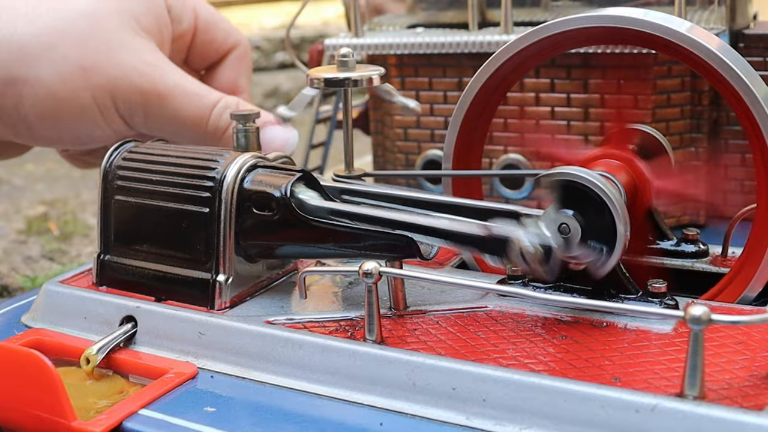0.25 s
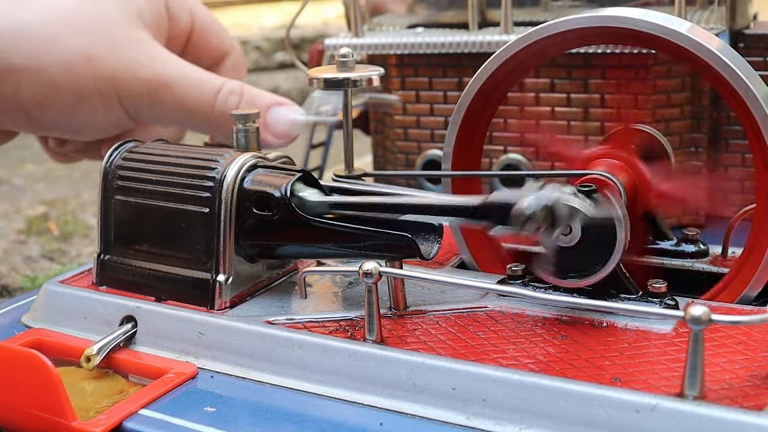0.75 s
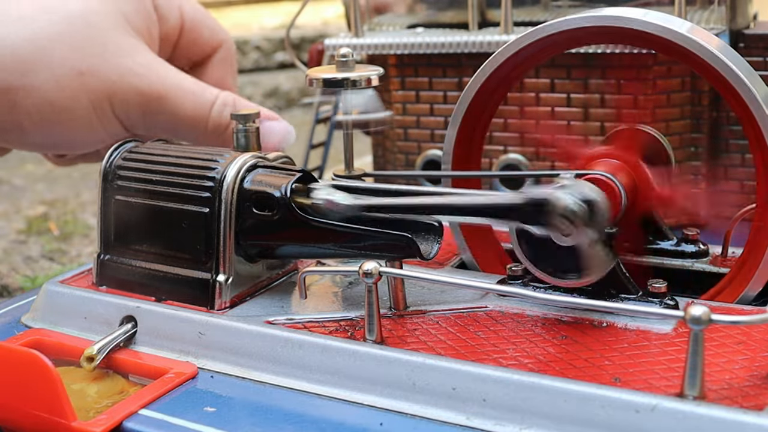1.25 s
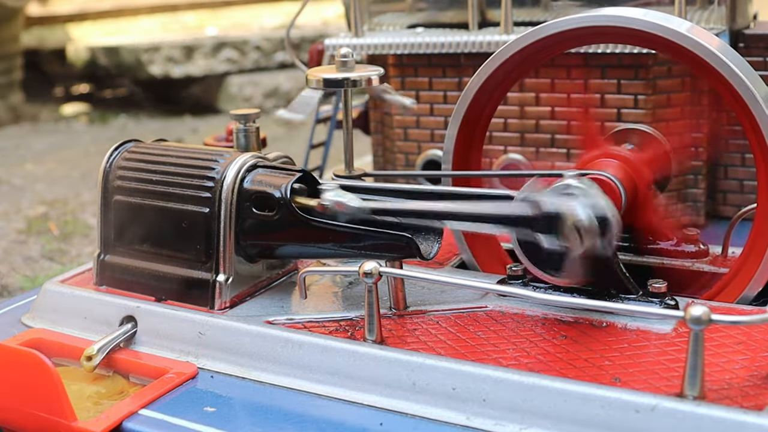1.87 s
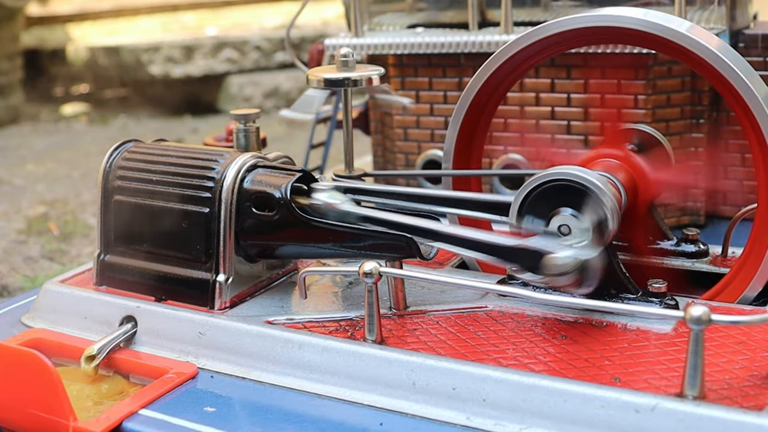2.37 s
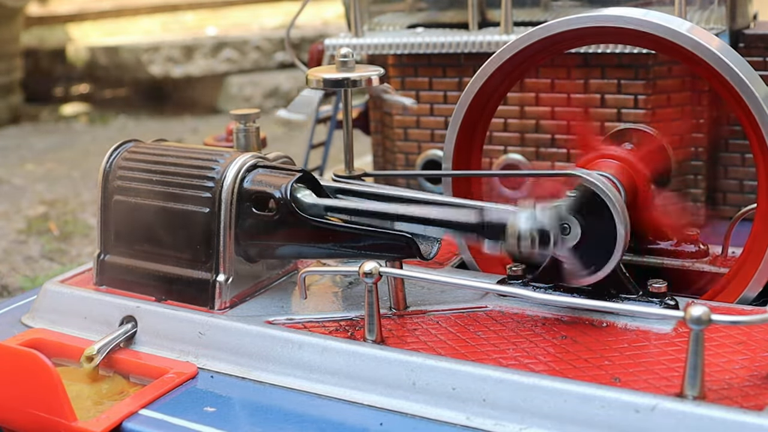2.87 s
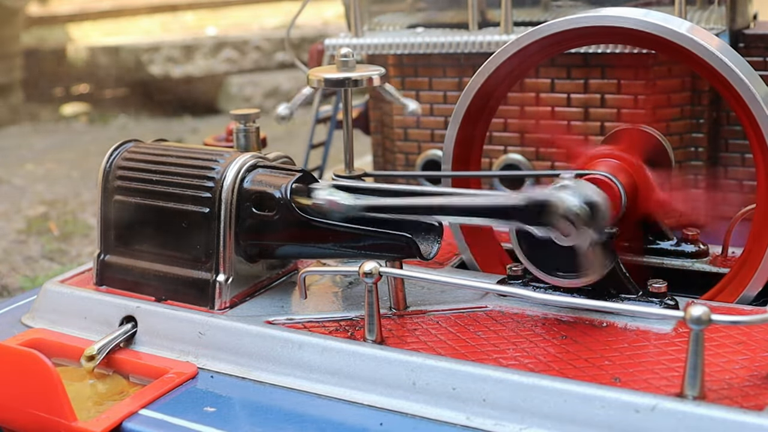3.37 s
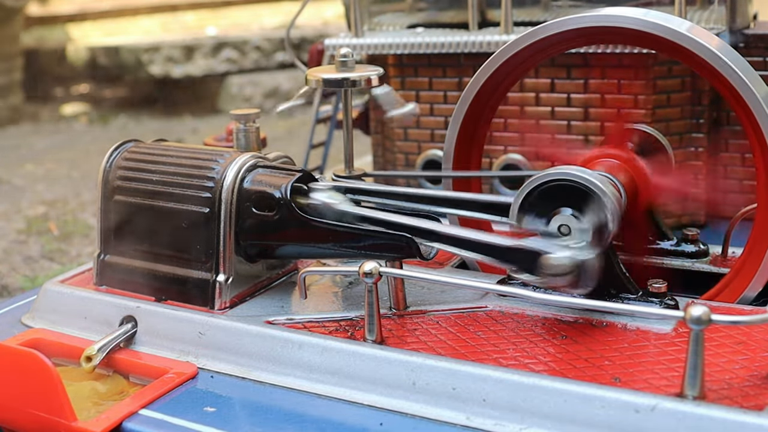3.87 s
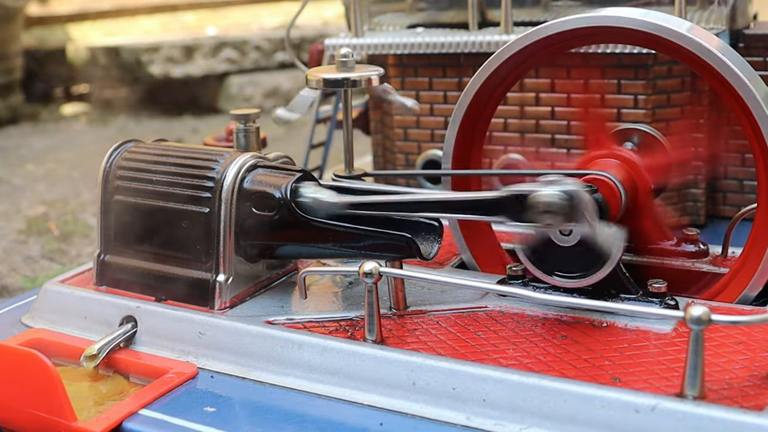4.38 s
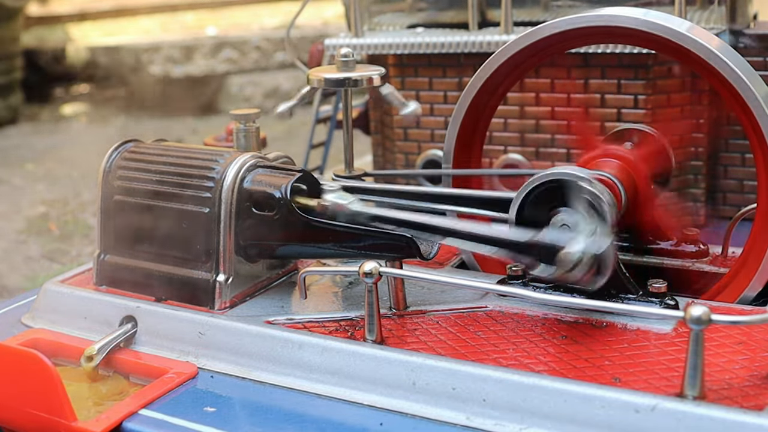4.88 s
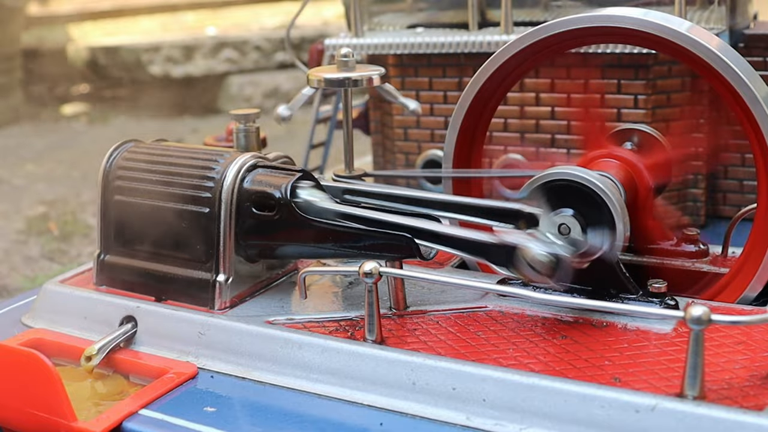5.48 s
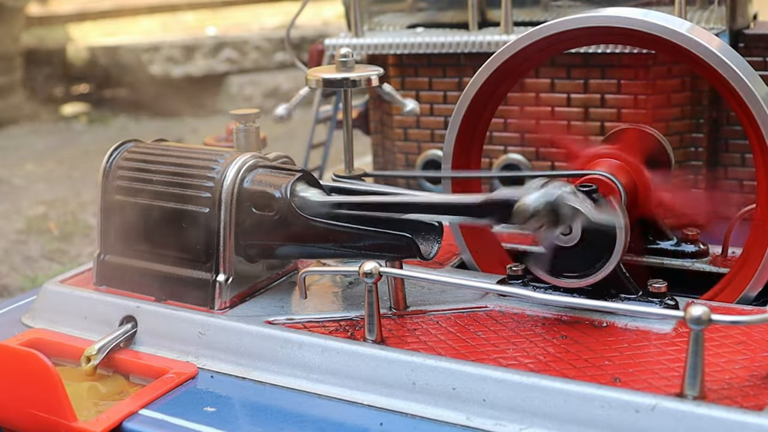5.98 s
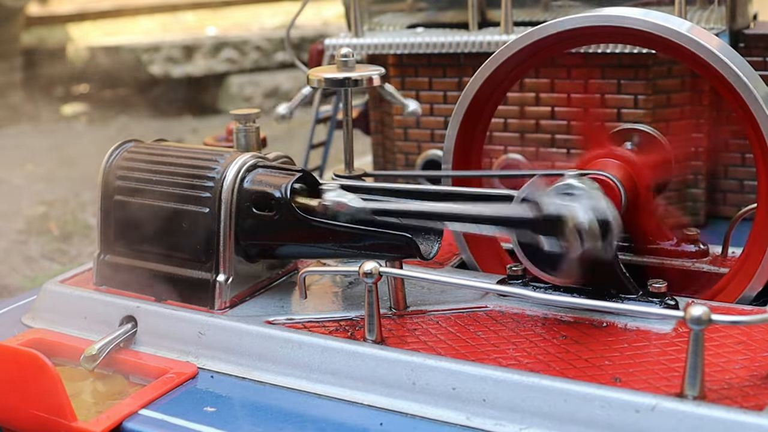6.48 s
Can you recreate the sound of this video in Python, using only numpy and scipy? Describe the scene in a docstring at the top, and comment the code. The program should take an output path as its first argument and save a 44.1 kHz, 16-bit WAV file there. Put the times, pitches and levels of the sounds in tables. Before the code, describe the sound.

From 0 to about 6.7 seconds a small model steam engine runs without pause, heard very close outdoors with hardly any echo. It turns about 8.5 times a second, dipping slightly near 0.7, rising to about 8.7 by 4 seconds, then easing a little. Each turn gives two brief exhaust puffs, crackling bursts of droplets and hiss, bright and uneven; wet slugs spit loudest in the first half second, around 1.3, 2.4 and 3.3 to 3.7, while the puffs thin out at moments between. Under them a repeating pattern of hollow knocks, dense metal rattle, a short valve rasp and a tiny high ping. Soft swishing follows the crank over a faint steady hiss. Lone drops snap throughout. A faint low rumble passes around 1.1 to 1.4, a dull stumbling bump at 2.5, and thin, very faint wavering whistles from 5.7 to 6.5. It ends still running.

```python
"""Model steam engine running outdoors

A model steam engine turns about 8.6 times a second, close to the microphone. Each end of the cylinder
puffs once a turn: bursts of drop spikes and hiss, as loud as the steam is wet, or a spat slug of condensate.
Slack in the rod and valve gear knocks a repeating pattern of hollow notes, rattle and ringing modes.
The valve rasps, a steel part pings, and noise swishes with the crank over a steady hiss. Single drops
snap, something bumps with a low rumble, and thin gliding sines whistle near the end."""
import sys
import numpy as np
from scipy import signal
from scipy.fft import rfft, irfft
from scipy.io import wavfile
from scipy.ndimage import uniform_filter1d, map_coordinates

SR = 44100
rng = np.random.default_rng(int(sys.argv[2]) if len(sys.argv) > 2 else 0)


def store_pcm(level_fs):
    """Save levels as 16-bit WAV."""
    pcm = np.round(np.clip(level_fs, -1, 1) * 32767).astype(np.int16)
    wavfile.write(sys.argv[1], SR, np.atleast_2d(pcm).T)


N = 297234
TIME = np.arange(N) / SR
MS = SR / 1000  # samples in a millisecond


def exhaust(drops_follow=.35):
    """Each cylinder end puffs once a turn, with fewer drops the drier the steam; lone drops snap between."""
    # wetness of the steam at each end, as the relative level of an ordinary puff: time_s, level_db
    first_wetness = [(0, -17.5), (1.0, -16), (1.802, -57), (2.299, -17), (2.8, -25.5), (3.55, -13.5),
                     (3.861, -26.5), (4.398, -11.5), (5.6, -16), (6.38, -22), (6.62, -15)]
    second_wetness = [(0.499, -8), (1.099, -18), (1.902, -15), (3.101, -12.5), (3.999, -26.5),
                      (4.502, -13.5), (5.452, -29), (5.9, -13), (6.7, -20.5)]
    # colours of the two puffs: frequency_hz, relative level_db
    first_spectrum = [(100, -37), (250, -17.5), (430, -10), (620, -22.5), (780, -16.5), (1600, -5),
                      (2200, -3), (2750, 1.5), (3300, -9), (4300, -3), (7500, -9), (11000, -14),
                      (13300, -20.5), (15200, -22.5)]
    second_spectrum = [(100, -28), (250, -11.5), (400, 3.5), (620, -4.5), (800, -9.5), (1600, 2),
                       (2200, 5.5), (2750, 7.5), (3500, -3.5), (5500, -3), (8500, -10.5), (10600, -9.5),
                       (13300, -23), (15200, -18)]
    # loudest lone drops snapping in the exhaust: time_s, relative level_db
    snaps = [(0.6645, -12.5), (1.030, -22.5), (1.1755, -8), (1.8186, -16.5), (2.083, -17.5), (2.4357, -40),
             (3.8553, -19.5), (3.8929, -19), (4.0795, -16), (4.280, -20), (4.3062, -30), (5.1604, -21),
             (5.219, -23.5), (5.3091, -20.5), (5.3374, -15.5), (5.8867, -19), (5.9164, -15.5), (6.142, -22),
             (6.192, -16.5), (6.5844, -15.5), (6.7166, -15.5)]
    # resonances of the exhaust outlet: pitch_hz, width_hz, level_db
    outlet = [(738, 61, 9.5), (1056, 46, 5), (2220, 27, -6.5), (3620, 61, 0.5), (4340, 67, 0),
              (9280, 390, 5), (10700, 320, 1), (14620, 1430, 8)]

    first, second = np.zeros(N), np.zeros(N)
    # ports open at these shares of a turn after the main knock
    for s, db, spread_s in puffs_of(.25, first_wetness, spread_s=.0044):
        wet = from_db(drops_follow * db)
        puff = spit(spread_s, pops_per_s=950 * wet, uneven_db=4, hiss_db=-4)
        add(first, s - 3 * spread_s, forced(puff, db))
    for s, db, spread_s in puffs_of(.665, second_wetness, spread_s=.0046):
        wet = from_db(drops_follow * db)
        puff = spit(spread_s, pops_per_s=700 * wet, uneven_db=6.5, hiss_db=-20.5)
        add(second, s - 3 * spread_s, forced(puff, db))

    for s, db in snaps:
        add(first, s, forced(signal.unit_impulse(64), db))
    for s, db in stray_drops():
        dull_drop = cut(signal.unit_impulse(64), 1993, "low", order=1)
        add(first, s, from_db(db) * unit_burst(dull_drop))

    first = at_microphones(first, first_spectrum, left_lead_ms=.084, pan_db=-2, scatter_db=-1.5, above_hz=630)
    second = at_microphones(second, second_spectrum, left_lead_ms=.081, pan_db=.5,
                            scatter_db=-1.5, above_hz=1460)
    puffs = from_db(-2) * first + from_db(-6.5) * second
    resonant = np.zeros_like(puffs)
    for hz, width_hz, db in outlet:
        b, a = signal.iirpeak(hz, hz / width_hz, fs=SR)
        resonant += from_db(db) * signal.lfilter(b, a, puffs)
    return puffs + resonant


def puffs_of(port, wetness, spread_s):
    """One puff a turn, as loud as the steam is wet, unless a slug leaves instead: rows of (s, dB, spread s)."""
    # slugs of condensate that spit out loudly in place of an ordinary puff: time_s, relative level_db, spread_s
    slugs = [(.039, -1.5, 0.0064), (.159, -3, .003), (.341, -4, 0.0092), (0.398, -4, 0.0085),
             (.458, -3, 0.0059), (.699, -7.5, 0.0051), (.812, -6.5, 0.0052), (.931, -9, 0.0044),
             (1.176, -10, 0.0015), (1.289, -2.5, 0.0056), (1.410, -4.5, 0.0033), (1.527, -6, 0.0041),
             (1.699, -7.5, 0.0057), (1.993, -7.5, 0.0073), (2.113, -5, 0.0052), (2.231, -7, 0.0047),
             (2.4, -1.5, 0.0066), (2.694, -7, 0.0074), (2.863, -7, 0.0035), (2.933, -12, 0.0029),
             (2.980, -4, 0.0042), (3.045, -7.5, 0.0026), (3.163, -10, 0.0018), (3.328, -1.5, 0.0049),
             (3.387, -8.5, 0.0049), (3.558, -0.5, 0.0065), (3.616, -9.5, .0032), (3.674, 0, 0.0032),
             (3.733, -8.5, 0.0031), (3.966, -6, 0.0038), (4.079, -3.5, 0.0027), (4.129, -5.5, 0.0056),
             (4.532, -5.5, 0.0043), (4.762, -10.5, 0.0031), (4.996, -5.5, .0029), (5.681, -6.5, 0.0079),
             (5.805, -5.5, 0.0028), (6.030, -4, 0.0073), (6.149, -7.5, .0033), (6.501, -10, .0022),
             (6.669, -8.5, 0.0056)]
    jitter_s, stretch_octaves, uneven_db = .0025, .35, 2  # chance in moment, length and level

    opens, rows = crank_passes(port), []
    quarter_turn_s = np.diff(opens).mean() / 4
    for s, (late, strength, stretch) in zip(opens, rng.standard_normal((len(opens), 3))):
        puff = (s + jitter_s * late,
                curve(wetness, s) + uneven_db * strength,
                spread_s * 2 ** (stretch_octaves * stretch))
        near = [slug for slug in slugs if abs(slug[0] - s) < quarter_turn_s]
        rows.append(near[0] if near else puff)
    return rows


def stray_drops(chance_per_turn=.35, level_db=-26):
    """Faint drops at any crank angle: rows of (s, relative dB)."""
    luck, share = rng.random((len(crank_passes(0)), 2)).T
    return [(s, level_db) for s in crank_passes(share)[luck < chance_per_turn]]


def spit(spread_s, pops_per_s, uneven_db, hiss_db):
    """Drops burst out one by one, each a one-sided pressure spike, in a swell of hiss six spreads long."""
    size = int(6 * spread_s * SR)
    swell = np.exp(-(np.linspace(-3, 3, size)) ** 2 / 4) * signal.windows.tukey(size)
    gaps = rng.gamma(2, .5, 200)  # irregular, mean 1
    sizes = np.minimum(rng.standard_normal(200), 1)
    at = (np.cumsum(gaps) * SR / pops_per_s).astype(int)
    inside = at < size
    pops = np.zeros(size)
    pops[at[inside]] = from_db(uneven_db * sizes[inside])
    hiss = rng.standard_normal(SR // 10)[np.arange(size) % (SR // 10)]
    return unit_burst(unit_burst(pops * swell) + from_db(hiss_db) * unit_burst(hiss * swell))


def forced(burst, db, bright_hz=13000, dulling=1.0, uneven_db=3):
    """A burst at level db; the harder it comes out, the higher the edge of its one-pole low-pass."""
    edge_hz = bright_hz * from_db(dulling * db + uneven_db * rng.standard_normal())
    pole = np.exp(-2 * np.pi * edge_hz / SR)
    return from_db(db) * unit_burst(signal.lfilter([1], [1, -pole], burst))


def linkage(ring_db=1.0, uneven_db=2.5, rattle_s=0.0044, rise_s=0.0011, loose_db=-7, size=2048):
    """Slack contacts repeat much alike each turn: a hollow note, a dense rattle and the ring of the bed."""
    # knocks in each turn: delay_s after the main knock, relative level_db, pitch_hz, swell_s, pitch_fall (1/s)
    contacts = [(-.0148, -26, 1340, 0.0018, 2), (0.0, -16.5, 995, 0.0013, 4.5),
                (.0055, -24.5, 680, 0.00091, -71), (.009, -26.5, 1230, .001, -31),
                (.0138, -35, 980, .0013, 8), (0.0118, -31.5, 423, 0.0013, -19),
                (0.033, -25.5, 1430, 0.00053, -5), (0.0403, -21, 1072, 0.00097, 53),
                (0.0469, -35, 510, 0.00062, 11), (0.0482, -30, 956, 0.0011, -4),
                (.052, -29.5, 461, 0.0019, 6), (.055, -35.5, 800, 0.0023, 24)]
    # ring of the bed plate and rods: pitch_hz, relative level_db, t60_s
    bed_modes = [(206, -10.5, 0.11), (500, -7, 0.22), (843, 2, 0.093), (1023, -4.5, 0.091),
                 (1412, 6, 0.027), (1674, 2, 0.048), (2136, -0.5, 0.035), (2705, 8.5, 0.028),
                 (3135, 3, 0.033), (3330, -1.5, 0.047), (3710, 2, 0.017), (4200, 3, 0.029),
                 (5540, -3, 0.028)]
    # dense rattle of the bed plate: frequency_hz, relative level_db
    bed_spectrum = [(80, -27.5), (200, -14), (500, -1.5), (1000, -20.5), (1700, -2.5), (2700, -3.5),
                    (4000, -4), (4800, -10.5), (6500, -12), (9000, -17.5), (13300, -47), (15200, -45)]
    rattle_db, note_uneven_db, note_detune = -1.5, 1.2, .015

    out, loose = np.zeros(N), np.zeros(N)
    knocks, t = crank_passes(0), TIME[:size]
    ring = from_db(ring_db) * unit_burst(ringing(bed_modes, t))
    rise = 1 - np.exp(-t / rise_s)
    for delay_s, db, hz, swell_s, fall in contacts:
        dense = unit_burst(colour(scatter(rattle_s), bed_spectrum))
        rattle = unit_burst(rise * (dense + ring))
        chance = rng.uniform(-1, 1, (len(knocks), 3)) * np.sqrt(3)  # rms 1
        for s, (strength, slack, detune) in zip(knocks, chance):
            at = s + delay_s * (1 + .012 * slack)
            gain = from_db(db + rattle_db + uneven_db * strength)
            note = hollow(hz * (1 + note_detune * detune), swell_s, fall, t)
            add(out, at, from_db(db + note_uneven_db * strength) * note + gain * rattle)
            # part of the rattle is new on every blow
            fresh = unit_burst(rng.standard_normal(size) * np.exp(-t / rattle_s))
            add(loose, at, gain * from_db(loose_db) * fresh)
    out = out + colour(loose, bed_spectrum)
    # the crank stands to the right, so the left port gets less of its treble
    left = out - 0.39 * cut(out, 2500, "high", order=1)
    return np.array([left, out]) * from_db([[-.6], [.6]])


def hollow(hz, swell_s, fall, t):
    """A few cycles of a hollow note that swells and dies as its pitch falls (rises if fall is negative)."""
    swell = (t / swell_s) ** 2 * np.exp(-t / swell_s)
    cycles = np.cumsum(hz * np.exp(-fall * t)) / SR
    return unit_burst(swell * np.sin(2 * np.pi * cycles))


def valve(lead_s=0.0042, spread_s=.0013, boost_db=9.5, uneven_db=0.5):
    """The slide valve gives a short rasp of spikes and hiss just before the main knock."""
    # rasp level before the boost: time_s, level_db
    rasp_levels = [(.3, -25), (.55, -36), (1.85, -35), (2.0, -22.5), (2.8, -25.5), (4.1, -32.5),
                   (4.35, -27), (4.95, -22), (6.15, -26), (6.5, -22.5)]
    # colour of the rasp: frequency_hz, relative level_db
    valve_spectrum = [(100, -11.5), (400, -10), (650, -13.5), (1200, 3), (2400, 1.5), (4500, -6),
                      (9000, -12), (11500, -18.5), (13300, -10), (15200, -66)]
    out = np.zeros(N)
    for s in crank_passes(0):
        db = curve(rasp_levels, s) + uneven_db * rng.standard_normal()
        rasp = spit(spread_s, pops_per_s=1500, uneven_db=10, hiss_db=-3)
        add(out, s - lead_s - 3 * spread_s, from_db(db + boost_db) * rasp)
    return at_microphones(out, valve_spectrum, left_lead_ms=.099, pan_db=-3.5, scatter_db=-5.5, above_hz=4000)


def ping(hz=11700, t60=0.0093, level_db=-26, uneven_db=-0.5, wander=.004):
    """A small steel part rings briefly with each main knock, at nearly the same pitch every time."""
    out, knocks = np.zeros(N), crank_passes(0)
    for s, (strength, detune) in zip(knocks, rng.standard_normal((len(knocks), 2))):
        note = unit_burst(ringing([(hz * (1 + wander * detune), 0, t60)], TIME[:SR // 20]))
        add(out, s, note * from_db(level_db + uneven_db * strength))
    return out * from_db([[-1.5], [1.5]])


def swish(uneven_db=4.0):
    """Sliding piston and flowing steam swell and fade with the crank angle."""
    # swish through one turn: share_of_turn, relative level_db
    stroke = [(0.0, -27.5), (.12, -30.5), (.29, -34), (.42, -33.5), (.56, -35.5), (.7, -50), (.8, -44.5),
              (.88, -38), (1.0, -49)]
    # colour of the swish: frequency_hz, relative level_db
    swish_spectrum = [(50, -2), (110, -6), (200, 3), (400, 9.5), (600, 6.5), (1000, 10), (1600, 1),
                      (2700, 6), (4800, -16), (9000, -6), (13300, -12.5), (14600, -10)]
    knocks = crank_passes(0)
    turns = np.interp(TIME, knocks, np.arange(len(knocks)))
    uneven = np.interp(TIME, knocks, rng.standard_normal(len(knocks)))
    db = curve(stroke, turns % 1) + uneven_db * uneven
    noise = wide_noise(swish_spectrum, left_lead_ms=0.067, apart_db=-4.0, above_hz=470)
    return from_db(db) * noise * from_db([[-.7], [.5]])


def handling(soft_hz=900, rumble_hz=70):
    """A soft stumbling bump rings the table, and low noise rumbles faintly under the hand."""
    # dull bumps on the table: time_s, relative level_db
    bumps = [(2.4985, -12), (2.5077, -21), (2.5118, -8)]
    # ring of the table: pitch_hz, relative level_db, t60_s
    table_modes = [(166, -2.5, 0.067), (213, 0.5, 0.022), (328, -10, 0.055), (408, -11.5, 0.036),
                   (700, -2.5, 0.017)]
    # rumble while the hand is at the engine: time_s, level_db
    rumble_levels = [(1.0, -78), (1.13, -42), (1.22, -63), (1.36, -61), (1.48, -80)]
    out = np.zeros(N)
    for s, db in bumps:
        add(out, s, from_db(db) * cut(ringing(table_modes, TIME[:SR // 5]), soft_hz, "low"))
    rumble = rms_one(cut(cut(rng.standard_normal(N), rumble_hz, "low"), 21, "high"))
    return out + from_db(curve(rumble_levels, TIME)) * rumble


def whistles(waver_hz=18, flutter_db=3):
    """Faint, nearly pure tones that glide and waver a little in pitch and level."""
    # thin whistles: start_s, end_s, start_hz, end_hz, level_db
    glides = [(5.725, 5.92, 3210, 3300, -41), (5.885, 6.022, 3190, 3280, -43),
              (6.074, 6.142, 3960, 3890, -44), (6.23, 6.323, 3300, 3240, -54),
              (6.29, 6.333, 3850, 3760, -58), (6.416, 6.468, 3310, 3350, -64)]
    out = np.zeros(N)
    for start, end, from_hz, to_hz, db in glides:
        t = TIME[:max(int((end - start) * SR), 2)]
        knots = rng.standard_normal((2, 20))  # one every 20 ms
        bend, flutter = [np.interp(t, np.arange(20) * .02, row) for row in knots]
        hz = np.linspace(from_hz, to_hz, len(t)) + waver_hz * bend
        tone = np.sin(2 * np.pi * np.cumsum(hz) / SR)
        tone = tone * signal.windows.tukey(len(t)) * from_db(flutter_db * flutter)
        add(out, start, from_db(db) * rms_one(tone))
    return out


def background(level_db=-45):
    """Steady hiss of the boiler and the open air, as coloured noise."""
    # colour of the hiss: frequency_hz, relative level_db
    air_spectrum = [(50, 2.5), (100, 6), (200, 10), (400, 5), (600, -5.5), (1000, -5), (2500, -6.5),
                    (4000, -8), (6000, -14.5), (11000, -12), (13300, -16), (15200, -17)]
    return from_db(level_db) * wide_noise(air_spectrum, left_lead_ms=0.0084, apart_db=7.0, above_hz=2700)


def crank_passes(share, first_knock_s=-0.0385):
    """The times at which the crank passes a given share of a turn, counted from the main knock."""
    # speed of the flywheel: time_s, turns_per_s
    speed = [(0, 8.497), (0.7, 8.414), (1.4, 8.436), (2.6, 8.612), (3.8, 8.735), (5.4, 8.708), (6, 8.595),
             (6.74, 8.555)]
    t = first_knock_s + np.arange(N + SR // 4) / SR
    turns = np.cumsum(curve(speed, t)) / SR
    return np.interp(np.arange(int(turns[-1])) + share, turns, t)


def at_microphones(x, spectrum, left_lead_ms, pan_db, scatter_db, above_hz):
    """Direct sound is offset in time between two ports; treble glances off metalwork as separate brief tails."""
    direct = [map_coordinates(x, [np.arange(N) + side * left_lead_ms * MS / 2], order=3) for side in (1, -1)]
    pole = np.exp(-1 / (1.6 * MS))
    level = np.sqrt(signal.lfilter([1 - pole], [1, -pole], x ** 2 + 1e-18))
    # half of the tail is a fixed scatter, half is fresh noise that follows the level of the sound
    fixed = np.array([signal.fftconvolve(x, scatter(.0015))[:N] for _ in direct])
    fresh = level * rng.standard_normal((2, N))
    glances = cut((fixed + fresh) / np.sqrt(2), above_hz, "high", order=1)
    ports = np.array([colour(port, spectrum) for port in direct + from_db(scatter_db) * glances])
    return ports * from_db([[pan_db / 2], [-pan_db / 2]])


def wide_noise(spectrum, left_lead_ms, apart_db, above_hz):
    """Coloured noise: the bass is shared by both ports, the treble partly their own."""
    shared, *own = [colour(white, spectrum) for white in rng.standard_normal((3, N))]
    later = map_coordinates(shared, [np.arange(N) - left_lead_ms * MS], order=3)
    return np.array([shared, later]) + from_db(apart_db) * cut(np.array(own), above_hz, "high", order=1)


def scatter(decay_s, size=2048):
    """A dense, dying train of reflections with an even spectrum; energy 1."""
    fade = np.exp(-TIME[:size] / decay_s)
    spectrum = rfft(rng.standard_normal(size) * fade)
    even = irfft(spectrum / np.sqrt(uniform_filter1d(np.abs(spectrum) ** 2, size=13)))
    return even / np.linalg.norm(even)


def ringing(modes, t):
    """Decaying sines of a struck body, alternating in sign."""
    out = np.zeros(len(t))
    for k, (hz, db, t60) in enumerate(modes):
        out += (-1) ** k * from_db(db - 60 * t / t60) * np.sin(2 * np.pi * hz * t)
    return out


def colour(x, spectrum, size=2048):
    """Causal (minimum-phase) filter with the given spectrum; white noise keeps its power."""
    hz, db = np.transpose(spectrum)
    grid = np.maximum(np.arange(size // 2 + 1) * SR / size, 1)
    gain = from_db(np.interp(np.log(grid), np.log(hz), db))
    gain = gain * grid / np.hypot(grid, hz[0] / 2)  # bass roll-off below the first point
    cepstrum = irfft(np.log(gain))
    # folding the cepstrum onto positive time makes the phase minimal
    cepstrum[1:size // 2] *= 2
    cepstrum[size // 2 + 1:] = 0
    response = irfft(np.exp(rfft(cepstrum)))
    return signal.fftconvolve(x, response / np.linalg.norm(response))[:len(x)]


def cut(x, hz, kind, order=2):
    """Butterworth low- or high-pass."""
    return signal.sosfilt(signal.butter(order, min(hz, .45 * SR), kind, fs=SR, output="sos"), x)


def curve(points, s):
    """Value of a control curve at times (or shares of a turn) s."""
    return np.interp(s, *np.transpose(points))


def from_db(db):
    """Decibels to gain."""
    return 10 ** (np.asarray(db) / 20)


def rms_one(x):
    """Scale to rms 1."""
    return x / np.sqrt(np.mean(x ** 2) + 1e-20)


def unit_burst(x):
    """Scale a short sound to the energy of one millisecond at rms 1."""
    return x * np.sqrt(MS / (np.sum(x ** 2) + 1e-20))


def add(out, s, sound):
    """Mix a short sound in from time s on."""
    at = round(s * SR) + np.arange(len(sound))
    inside = (at >= 0) & (at < N)
    out[at[inside]] += sound[inside]


def scene():
    """The engine with its surroundings."""
    engine = exhaust() + linkage() + valve() + ping() + swish()
    return engine + handling() + whistles() + background()


def record(dry):
    """The deep bass rolls off, the highest peaks are rounded and the top is cut."""
    sound = 1.1 * np.tanh(cut(dry, 45, "high") / 1.1)
    return signal.sosfilt(signal.ellip(10, .1, 80, 15900, fs=SR, output="sos"), sound)


dry = scene()
out = record(dry)
store_pcm(out)
```